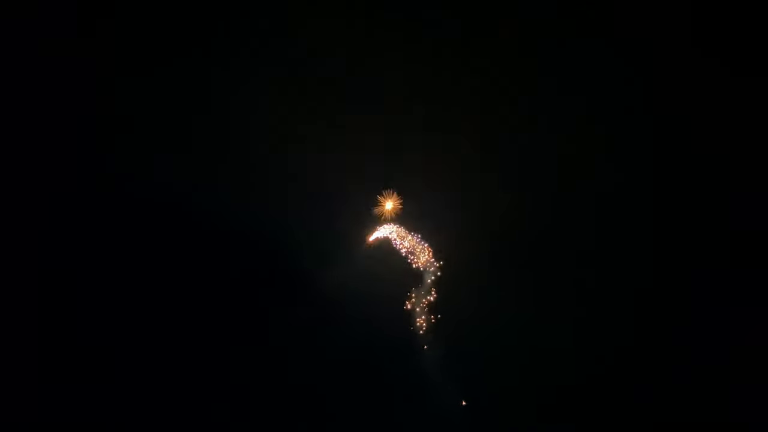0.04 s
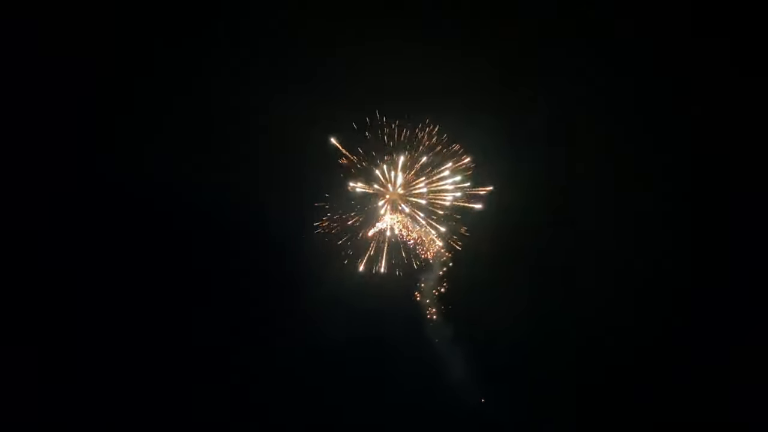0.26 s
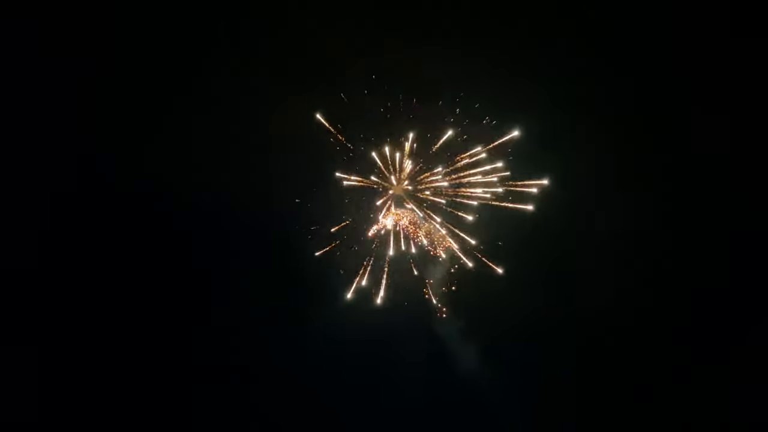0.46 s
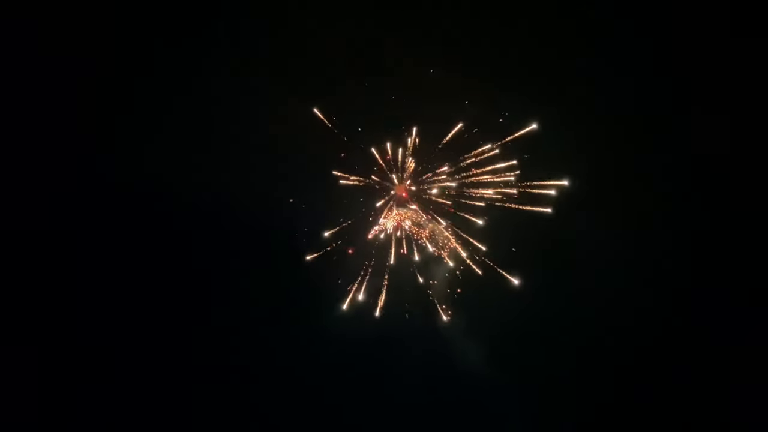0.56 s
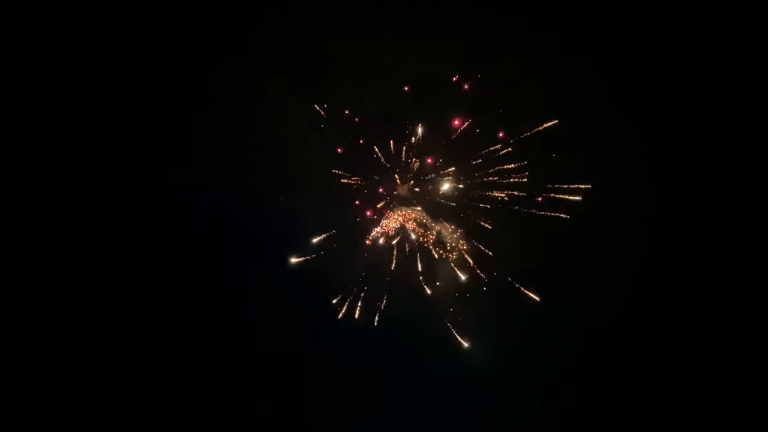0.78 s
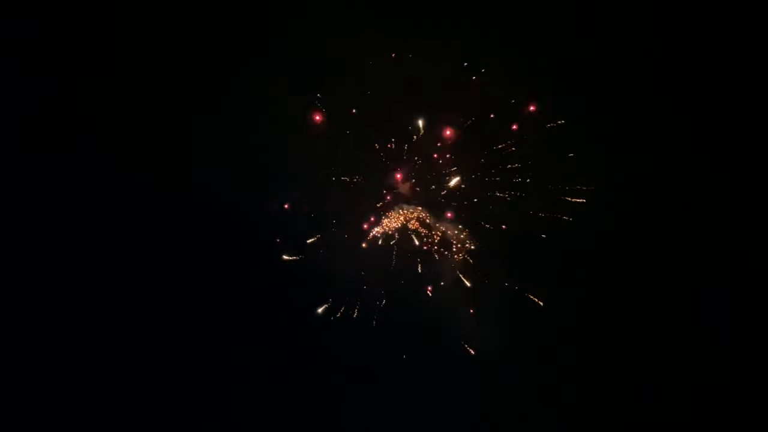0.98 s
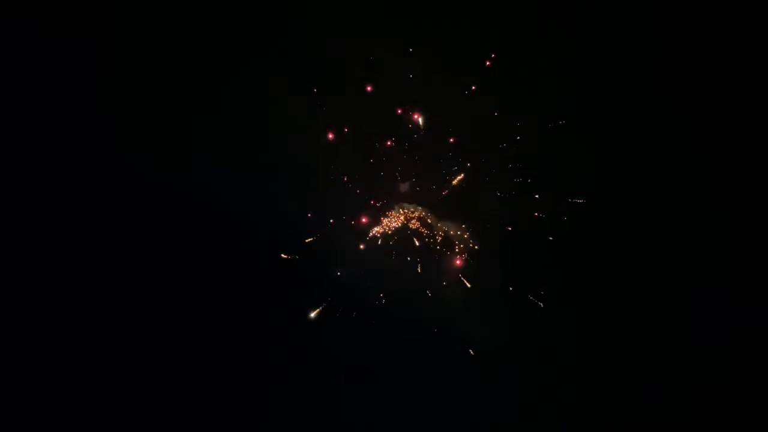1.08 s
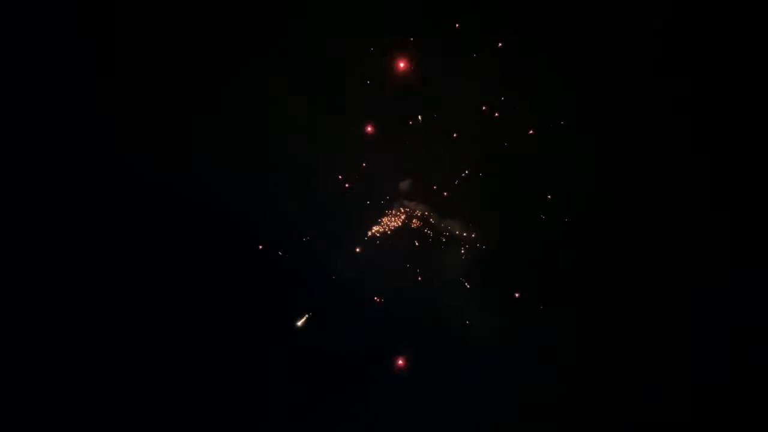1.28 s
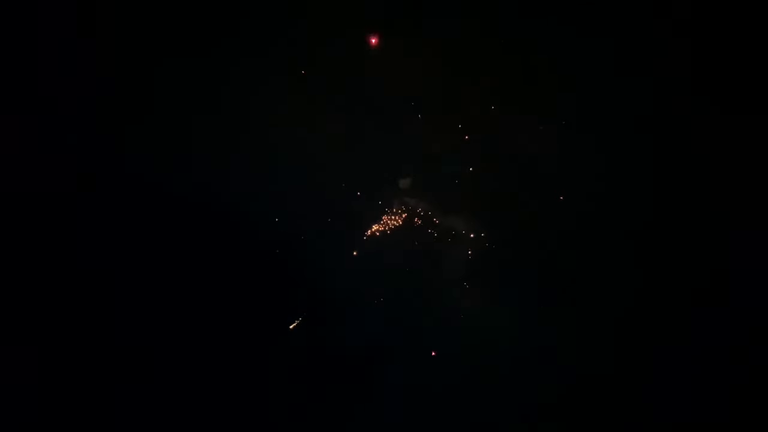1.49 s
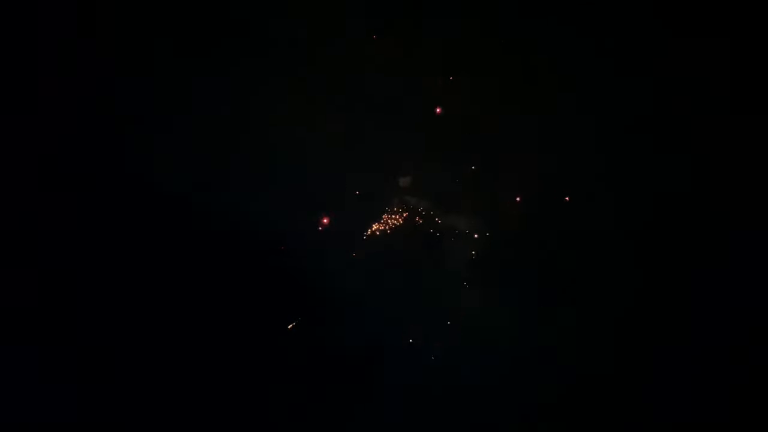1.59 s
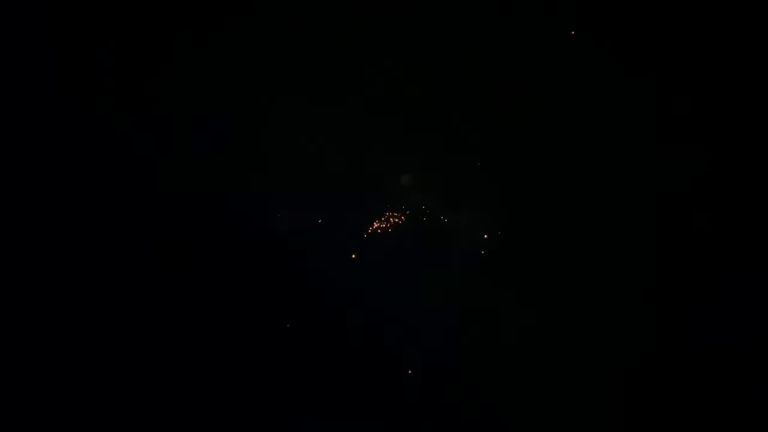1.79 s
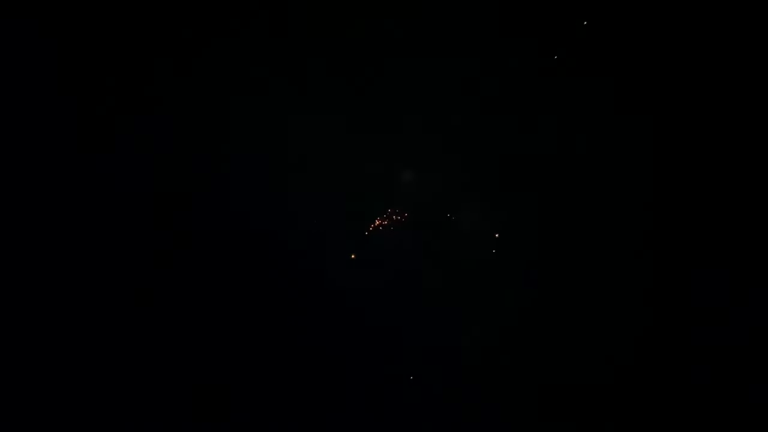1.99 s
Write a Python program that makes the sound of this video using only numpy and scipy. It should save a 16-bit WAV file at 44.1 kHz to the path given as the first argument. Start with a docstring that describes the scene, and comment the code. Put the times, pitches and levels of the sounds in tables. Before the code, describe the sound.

One loud firework bang, its rumbling echo fading over a field, then a faint distant mortar thump

```python
"""A firework shell bursts over an open field: two shock fronts 12 ms apart, each a crack over a falling sweep.
A suction dip and a deep swelling tone follow. The surroundings answer with single echoes (filtered sweeps
with noise cracks), washes of hiss and a rolling rumble (flickering noise bands), with faint crackles in them.
Near the end a mortar thumps farther off, its tube ringing. Soft noise lies behind it all; a limiter ducks the bang."""
import sys
import numpy as np
from scipy import signal
from scipy.io import wavfile
from scipy.ndimage import uniform_filter1d

SR = 44100
rng = np.random.default_rng(int(sys.argv[2]) if len(sys.argv) > 2 else 0)


def wav_out(sig):
    """Save sig, one row per channel (or a flat mono array), as 16-bit PCM at SR to the path in sys.argv[1]."""
    wavfile.write(sys.argv[1], SR, np.round(np.clip(np.atleast_2d(sig).T, -1, 1) * 32767).astype(np.int16))


N = 90404
T = np.arange(N) / SR
BURST_S, FRONT_GAP_S = .2219, .0118

# Single echoes of the burst. Each row: start in seconds, body level in dB, body low cut in Hz,
# body high cut in Hz, crack centre in Hz, crack level in dB.
ECHOES = [(0.344, -20, 226, 770, 2450, -26.5), (0.4434, -23, 255, 1440, 2180, -24.5),
          (0.522, -30, 178, 454, 1040, -40), (0.694, -32, 240, 814, 796, -38),
          (0.864, -37.5, 60, 199, 493, -52), (0.889, -31.5, 60, 190, 500, -69),
          (0.903, -32, 59.6, 195, 500, -67)]
# Faint crackles. Each row: start in seconds, body level in dB, body low cut in Hz,
# body high cut in Hz, crack centre in Hz, crack level in dB.
CRACKLES = [(0.626, -31, 226, 740, 2200, -33), (0.643, -31.5, 259, 1190, 1510, -30),
            (0.6584, -54, 600, 1404, 1240, -40), (1.323, -44.5, 407, 900, 2350, -45.5),
            (1.338, -52, 410, 900, 2000, -47.5), (1.381, -39.5, 660, 1010, 1096, -40),
            (1.506, -50, 427, 1040, 2200, -43), (1.567, -42, 506, 1500, 1890, -43.5),
            (1.572, -42, 400, 980, 860, -39), (1.853, -45.5, 307, 833, 2380, -43.5)]
# Mortar thumps and their echoes. Each row: start in seconds, body level in dB, body low cut in Hz,
# body high cut in Hz, crack centre in Hz, crack level in dB.
THUMPS = [(1.9547, -28.5, 110, 400, 1930, -33), (1.9691, -38.5, 130, 520, 1760, -34),
          (1.982, -43.5, 150, 480, 1710, -40.5), (1.9967, -40, 150, 380, 2800, -55),
          (2.0053, -28.5, 120, 320, 2140, -36), (2.031, -38.5, 135, 362, 2220, -43)]


def from_db(db):
    """Decibels to gain."""
    return 10 ** (np.asarray(db) / 20)


def rms_one(x):
    """Scale to rms 1."""
    return x / np.sqrt(np.mean(x ** 2) + 1e-20)


def at_hz(points, hz):
    """Read a spectrum on a log-frequency axis."""
    f, v = np.transpose(points)
    return np.interp(np.log(hz), np.log(f), v)


def cut(x, hz, kind, order=2):
    """Butterworth filter."""
    sos = signal.butter(order, np.clip(hz, 10, .45 * SR), kind, fs=SR, output="sos")
    return signal.sosfilt(sos, x + 1e-18)


def dying(s, decay_s):
    """Sudden start, exponential decay."""
    return (T >= s) * np.exp(-np.maximum(T - s, 0) / decay_s)


def placed(pair):
    """A source slightly off centre, a little louder on the right."""
    pan_db = -.4
    return pair * from_db([[pan_db], [-pan_db]])


def lagged(pair, lag_s):
    """The sound reaches the right microphone a little later."""
    return np.array([pair[0], np.interp(T - lag_s, T, pair[1])])


def narrowed(pair, width):
    """Keep only a share of the side sound."""
    mid = pair.mean(axis=0)
    return mid + width * (pair - mid)


def drift(corner_hz):
    """Slow random wander of rms 1: noise through two equal one-pole lowpasses."""
    step = 40  # samples between points of the wander
    r = np.exp(-2 * np.pi * corner_hz * step / SR)
    settle = 2000  # points dropped while the filter settles
    white = rng.standard_normal(N // step + settle + 2)
    slow = signal.lfilter([1], [1, -2 * r, r * r], white)[settle:]
    return np.interp(np.arange(N) / step, np.arange(len(slow)), rms_one(slow))


def banded_noise(colour, patchiness, air_db_per_s=0, pan=None):
    """Stereo noise in bands whose levels flicker, partly together; rms 1 before the air dulls it."""
    # Likeness of left and right. Each row: frequency in Hz, correlation from -1 to 1.
    likeness = [(40, 1), (300, 0.77), (700, 0.093), (1400, 0.76), (3000, 0.11), (8000, 0.032)]
    air_from_s, air_ref_hz = .092, 8030  # full air loss applies from the reference pitch up
    air_age = np.maximum(T - air_from_s, 0)
    edges = np.geomspace(22, 17000, 23)
    white = rng.standard_normal((2, 2, N))
    together = drift(31)
    out, power = 0, 0
    for k, (low, high) in enumerate(zip(edges, edges[1:])):
        hz = np.sqrt(low * high)
        if not colour[0][0] / 2 < hz < colour[-1][0] * 2:
            continue
        # neighbouring bands take turns on two independent noises
        mid, side = cut(white[k % 2], [low, high], "band")
        alike = np.clip(at_hz(likeness, hz), -1, 1)
        pair = np.sqrt(1 + alike) * mid + np.sqrt(1 - alike) * side * [[1], [-1]]
        flicker_db = patchiness * (together + drift(9.1)) / 2
        band = from_db(at_hz(colour, hz) + flicker_db) * pair
        if pan:
            band = band * from_db(at_hz(pan, hz) * np.array([[.5], [-.5]]))
        power += np.mean(band ** 2)
        # later sound has crossed more air and loses its top
        air_db = air_db_per_s * air_age * min(hz / air_ref_hz, 1) ** 2
        out = out + band * from_db(-air_db)
    return out / np.sqrt(power)


def sweep(s, hold_s):
    """One pressure front: a sudden edge whose lower pitches arrive later."""
    turns, start_s = 1.4, .00115  # pitch in Hz is turns / (start + age)
    end_s, fade_power = .029, 3.1  # the sweep dies out around end_s; the power sets how steeply hold ends
    age = np.maximum(T - s, 0)
    fade = np.exp(-(age / end_s) ** 4) / (1 + (age / hold_s) ** fade_power)
    return (T >= s) * fade * np.cos(2 * np.pi * turns * np.log1p(age / start_s))


def smeared(x):
    """Add a short random train of reflections that swells quickly and decays."""
    train_db, rise_s, decay_s = -7, .0054, .012
    age = T[:SR // 10]
    train = rng.standard_normal(len(age)) * np.exp(-age / decay_s) * (1 - np.exp(-age / rise_s))
    train = train / np.linalg.norm(train)
    return x + from_db(train_db) * signal.fftconvolve(x, train)[:N]


def reports(rows, hold_s):
    """Bodies of far fronts, thinned, dulled and smeared on their way."""
    out = 0
    for s, db, low_hz, high_hz, *_ in rows:
        thinned = cut(sweep(s, hold_s), low_hz, "high")
        dulled = cut(thinned, high_hz, "low", order=3)
        out = out + from_db(db) * smeared(dulled)
    return out


def field():
    """The quiet background: steady coloured noise with flickering bands."""
    # Background colour. Each row: frequency in Hz, density in dB per Hz.
    field_colour = [(25, -10), (50, 0), (130, 0), (270, -3.5), (450, -10.5), (800, -20.5), (1500, -21.5),
                    (2700, -29), (4000, -40.5), (6000, -47.5), (11000, -47.5), (16000, -102)]
    level_db = -47
    return from_db(level_db) * banded_noise(field_colour, patchiness=3.5)


def scatter():
    """The bang rolls back in washes of hiss and rumble that swell and die away."""
    # Scattered washes. Each row: start in seconds, rise in seconds, decay in seconds,
    # treble level in dB, middle level in dB, rumble level in dB.
    washes = [(0.237, 0.011, 0.074, -37.5, -44.5, -41.5), (0.328, 0.032, 0.12, -31, -68, -38),
              (0.409, 0.032, 0.037, -38, -43, -66), (0.486, 0.005, 0.068, -61, -49, -41),
              (0.681, 0.0096, 0.2, -42, -51.5, -39.5), (0.851, 0.01, 0.14, -96, -82, -43),
              (1.077, 0.03, 1, -53, -65, -52.5), (1.17, 0.066, 0.076, -48.5, -63.5, -41.5),
              (1.29, 0.044, 0.065, -50, -51, -42.5), (1.559, 0.03, 0.01, -50, -48.5, -42)]
    # Hiss colour. Each row: frequency in Hz, density in dB per Hz.
    treble_colour = [(1200, -8.5), (2000, -5), (2900, -5), (4000, -9.5), (6000, -5.5), (8000, -7.5),
                     (11000, -19.5), (14500, -41)]
    # Middle colour. Each row: frequency in Hz, density in dB per Hz.
    middle_colour = [(300, -13.5), (500, -7.5), (800, 13), (1300, -6), (1900, -13), (2800, -38.5)]
    # Rumble colour. Each row: frequency in Hz, density in dB per Hz.
    rumble_colour = [(25, -17), (50, -9.5), (85, -6), (150, 3.5), (280, 2), (420, -9.5), (700, -30.5),
                     (1500, -48.5)]
    power = 0
    for s, rise_s, decay_s, *levels_db in washes:
        rise = np.clip((T - s) / rise_s, 0, 1)
        swell = rise * np.exp(-np.maximum(T - s - rise_s, 0) / decay_s)
        power = power + np.outer(from_db(levels_db), swell) ** 2
    treble, middle, rumble = np.sqrt(power)
    return (treble * banded_noise(treble_colour, patchiness=2.5, air_db_per_s=30.5)
            + middle * banded_noise(middle_colour, patchiness=2.5)
            + rumble * banded_noise(rumble_colour, patchiness=2.5))


def mortar():
    """Far thumps ring the tube's hollow tone and overtones, and trail a rattle of small reflections."""
    # Tube overtones struck by each thump. Each row: frequency in Hz, level in dB relative to
    # the thump's crack, time to fall by 60 dB in seconds.
    tube_overtones = [(553, -21, 0.04), (730, -0.5, 0.033), (790, -13, 0.052)]
    tube_hz, tube_q, tube_db = 221.5, 3.4, 9
    clicks_per_s, rattle_db, rattle_decay_s = 1500, -12, .028
    body = reports(THUMPS, hold_s=.014)
    hollow = from_db(tube_db) * signal.lfilter(*signal.iirpeak(tube_hz, tube_q, fs=SR), body)
    overtones, trail_power = 0, 0
    for s, *_, crack_db in THUMPS:
        for hz, mode_db, t60_s in tube_overtones:
            ring = dying(s, t60_s / np.log(1000)) * np.sin(2 * np.pi * hz * (T - s))
            overtones = overtones + from_db(crack_db + mode_db) * ring
        trail_power = trail_power + (from_db(crack_db + rattle_db) * dying(s, rattle_decay_s)) ** 2
    clicks = (rng.random(N) < clicks_per_s / SR) * rng.standard_normal(N)
    rattle = np.sqrt(trail_power) * rms_one(cut(clicks, [750, 2600], "band", order=3))
    return placed(body + hollow + overtones + rattle)


def far_cracks():
    """Each far front starts with a rough crack of its own colour and strength, and trails a short rustle."""
    spread = 1.104  # band edges as a ratio to the centre
    crack_decay_s, tail_db, tail_decay_s = .0014, -21, .04
    side_share, top_hz = .4, 4300
    out = 0
    for s, *_, hz, db in ECHOES + CRACKLES + THUMPS:
        noise = rms_one(cut(rng.standard_normal((2, N)), [hz / spread, hz * spread], "band"))
        snap = dying(s, crack_decay_s)
        crack = snap * noise
        # give every crack the energy of its envelope, whatever the noise drew
        crack = crack * np.linalg.norm(snap) / np.linalg.norm(crack, axis=1, keepdims=True)
        mid, side = crack + from_db(tail_db) * dying(s, tail_decay_s) * noise
        out = out + from_db(db) * (mid + side_share * side * [[1], [-1]])
    return cut(out, top_hz, "low", order=6)


def far_reports():
    """Bodies of the burst's echoes and of the crackles, slightly off centre."""
    return placed(reports(ECHOES, hold_s=.014) + reports(CRACKLES, hold_s=.009))


def boom():
    """A deep tone that swells and fades after the burst under a bell-shaped envelope."""
    hz, level_db, centre_s, width_s = 50, -35, .365, .07
    age = np.maximum(T - BURST_S - FRONT_GAP_S, 0)
    swell = np.exp(-((T - centre_s) / width_s) ** 2 / 2)
    return from_db(level_db) * (age > 0) * swell * np.sin(2 * np.pi * hz * age)


def suction():
    """The pressure dips below rest behind the second front, then returns."""
    depth_db, deepest_s = -17.5, .011
    age = np.maximum(T - BURST_S - FRONT_GAP_S, 0) / deepest_s
    return -from_db(depth_db) * age * np.exp(1 - age)


def burst():
    """Two shock fronts, each a falling sweep with a bright crack and a brief sizzle."""
    # Shock fronts. Each row: body level in dB, hold in seconds, crack level in dB,
    # lag of the body at the right microphone in seconds.
    shocks = [(1.5, 0.034, -7.5, 0.00023), (6, 0.008, -10, .00005)]
    # Crack colour. Each row: frequency in Hz, density in dB per Hz.
    crack_colour = [(900, -26.5), (1600, -8.5), (2400, -1.5), (3300, 2), (4800, -1.5), (6500, -8.5),
                    (8700, -2.5), (11000, -19.5), (16000, -22)]
    # Crack balance ahead of the narrowing. Each row: frequency in Hz, left minus right in dB.
    crack_pan = [(1000, -2.5), (2300, -6.5), (4300, -2), (8500, 4), (14000, -6.5)]
    crack_decay_s, sizzle_db, sizzle_decay_s = .0012, -24, .014
    body, edge = 0, 0
    for k, (db, hold_s, crack_db, lag_s) in enumerate(shocks):
        s = BURST_S + k * FRONT_GAP_S
        front = placed(cut(sweep(s, hold_s), 4530, "low"))
        body = body + from_db(db) * lagged(front, lag_s)
        edge = edge + from_db(crack_db) * dying(s, crack_decay_s)
        edge = edge + from_db(sizzle_db) * dying(s, sizzle_decay_s)
    noise = banded_noise(crack_colour, patchiness=1.5, pan=crack_pan)
    return body + edge * narrowed(noise, width=.7)


def scene():
    """Burst, echoes, crackles and mortar over the field's background."""
    near = burst() + boom() + suction()
    # the deepest part favours the left microphone
    tilt_db, tilt_hz = -7.5, 89
    near = near + from_db(tilt_db) * cut(near, tilt_hz, "low", order=1) * [[1], [-1]]
    far = far_reports() + far_cracks() + mortar() + scatter() + field()
    return near + lagged(far, lag_s=.00026)


def record(dry):
    """A limiter ducks under the bang and recovers; peaks that slip past are flattened, the top is cut."""
    limit_db, release_db_per_s, attack_s = -3, 68.5, .00035
    level_db = 20 * np.log10(uniform_filter1d(np.abs(dry).max(axis=0), size=31) + 1e-9)
    excess_db = np.maximum(level_db - limit_db, 0)
    # hold the largest excess while it recovers along a straight line in dB
    recovery_db = release_db_per_s * T
    ducked_db = np.maximum.accumulate(excess_db + recovery_db) - recovery_db
    r = np.exp(-1 / (attack_s * SR))
    ducked = dry * from_db(-signal.lfilter([1 - r], [1, -r], ducked_db))
    ceiling = .92
    flattened = ducked / (1 + np.abs(ducked / ceiling) ** 8) ** (1 / 8)
    stop_hz = 17384  # 70 dB down from here up
    return signal.sosfilt(signal.cheby2(12, 70, stop_hz, fs=SR, output="sos"), flattened)


dry = scene()
out = record(dry)
wav_out(out)
```